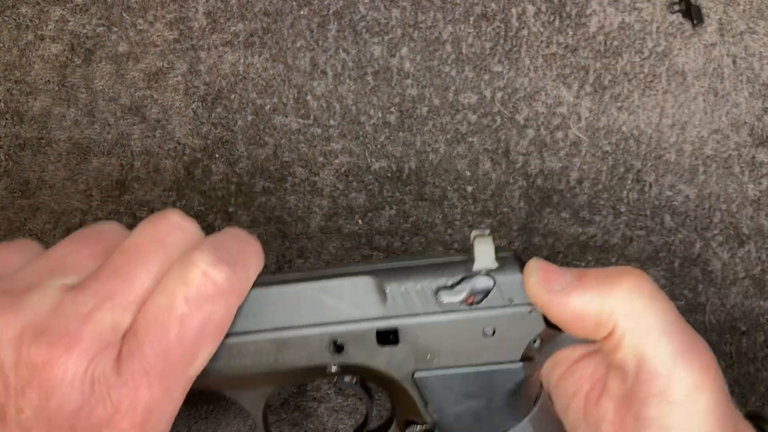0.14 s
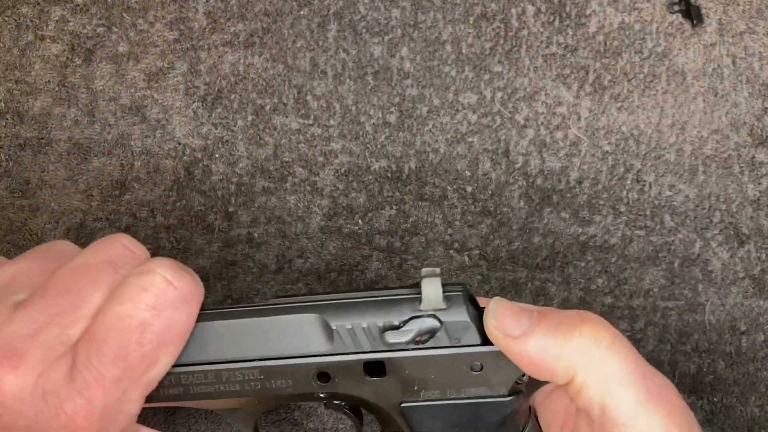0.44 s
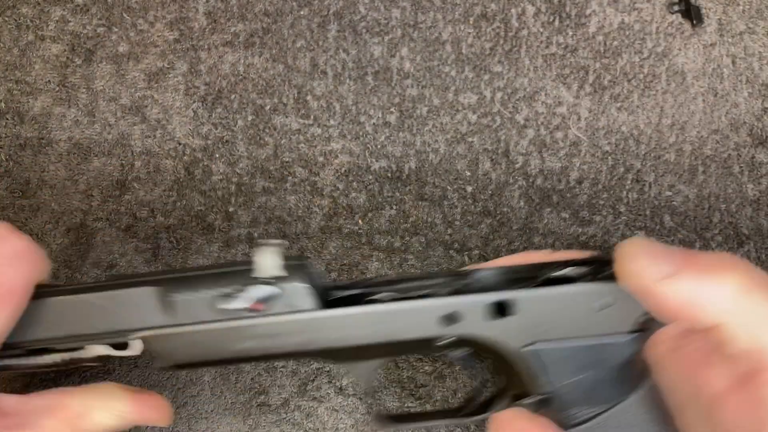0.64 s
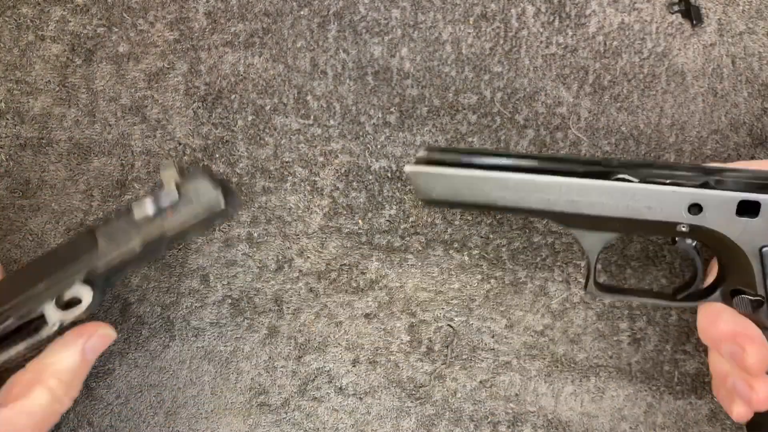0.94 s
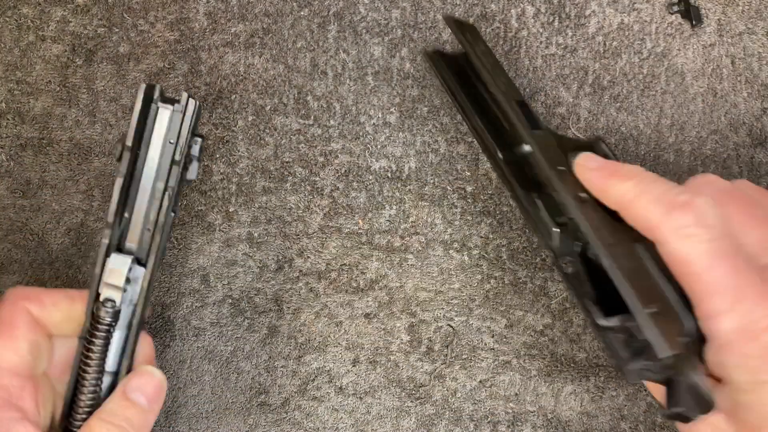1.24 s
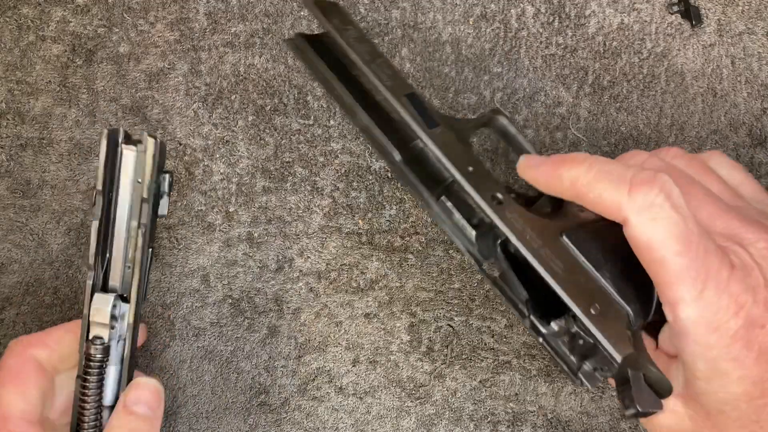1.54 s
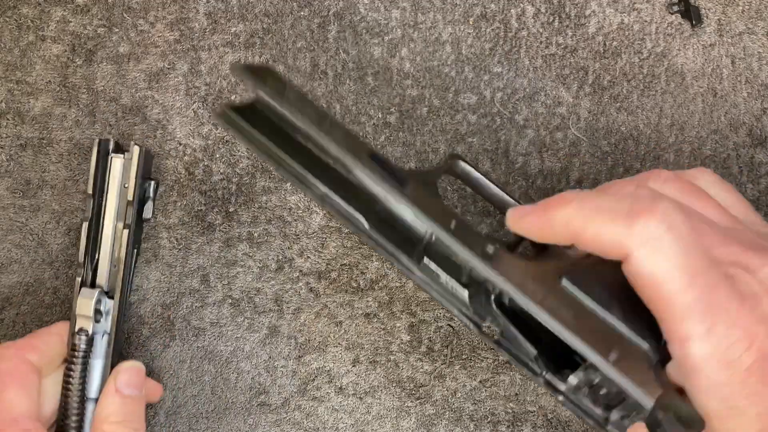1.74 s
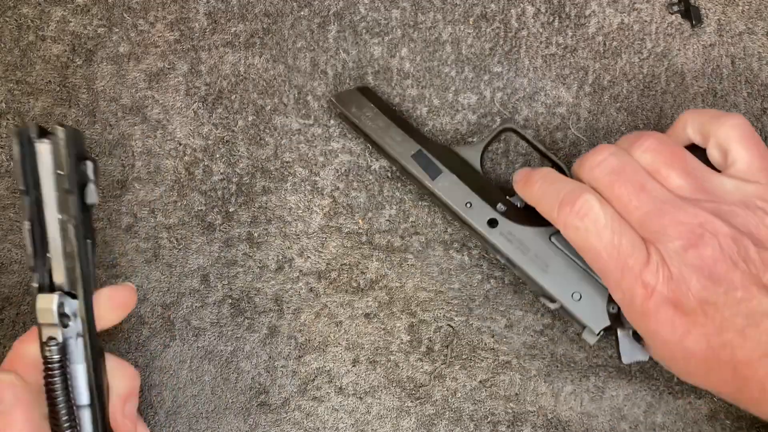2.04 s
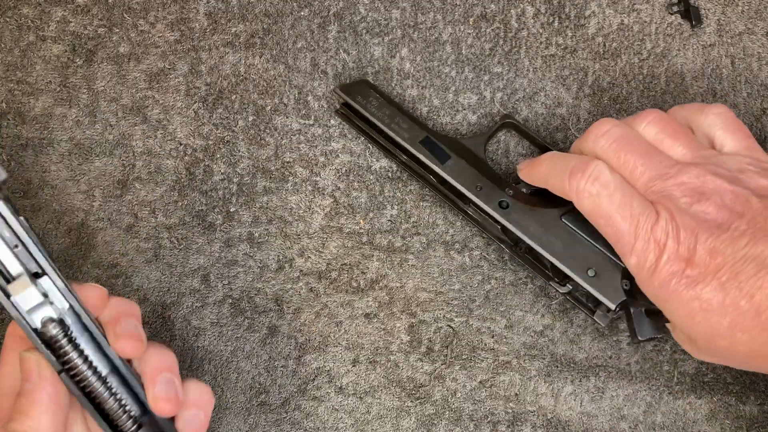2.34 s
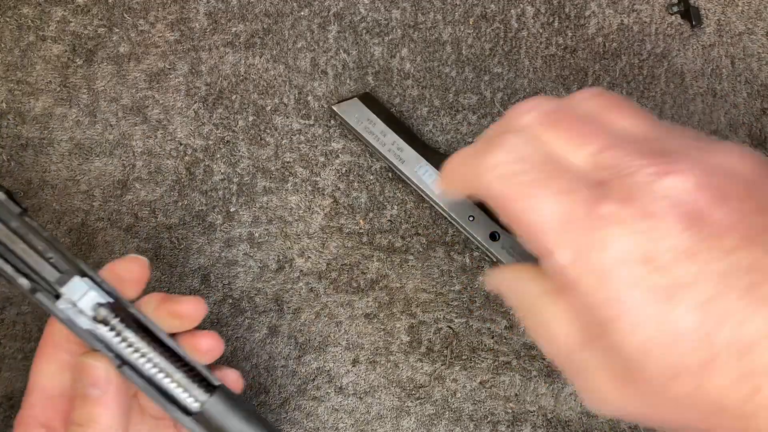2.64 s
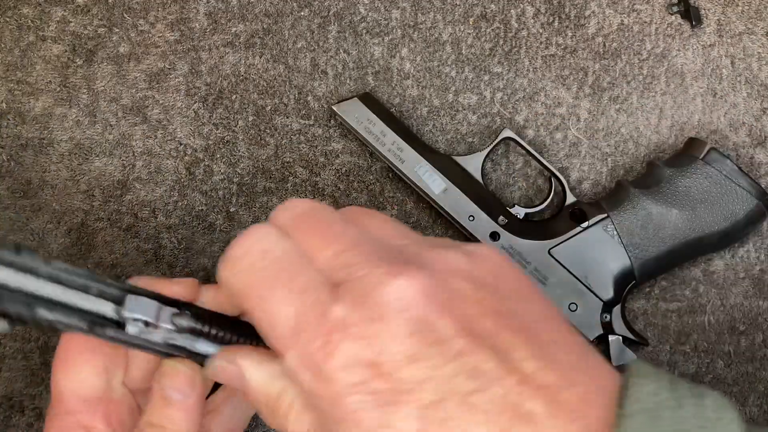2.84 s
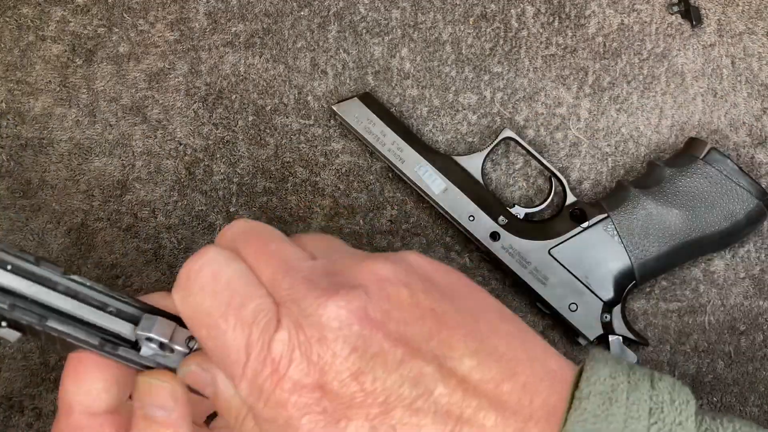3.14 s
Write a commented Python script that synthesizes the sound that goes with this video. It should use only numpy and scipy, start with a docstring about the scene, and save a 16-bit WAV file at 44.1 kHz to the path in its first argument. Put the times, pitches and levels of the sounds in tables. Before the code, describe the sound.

A pistol is taken apart close to the microphone in a small dry room. Small catches click at 0.1 and 0.26 s; from 0.5 to 0.75 s the steel slide scrapes along its rails, rising in pitch, with bright ringing clacks. Very faint handling ticks at 1.5, a soft bump at 2.04, a lever tick at 2.3, a loud deep carpeted thud at 2.44, a faint tick at 2.9. Low hum and hiss.

```python
"""Small catches click, then a steel slide scrapes forward along its rails and knocks free: a pistol is
taken apart close to the microphone in a small room. The frame touches the carpeted table, a loose lever
ticks, and the frame is set down with a dull thud. Faint handling ticks, mains hum, rumble and hiss lie
underneath. Metal sounds are short noise bursts or rubbing slips sent through ringing or coloured filters;
the thuds are soft pushes into the table's low modes, with a muffled rattle."""
import sys
import numpy as np
from scipy import signal
from scipy.fft import rfft, irfft, next_fast_len
from scipy.io import wavfile
from scipy.ndimage import uniform_filter1d, map_coordinates

SR = 44100
rng = np.random.default_rng(int(sys.argv[2]) if len(sys.argv) > 2 else 0)


def generate_wav(signal):
    """Clip the signal to [-1, 1] and save it as 16-bit WAV at the path in sys.argv[1]."""
    frames = np.transpose(np.atleast_2d(signal))
    scaled = np.clip(frames, -1, 1) * 32767
    pcm = np.round(scaled).astype(np.int16)
    wavfile.write(sys.argv[1], SR, pcm)


N = 145530
T = np.arange(N) / SR  # time of every sample, in seconds

# centres of the bass, middle and treble tone settings of each click: pitch_hz
TONE_CENTRES_HZ = [1260, 2500, 5100]


def amp(db):
    """Turn decibels into gain."""
    return 10 ** (np.asarray(db) / 20)


def unit(x):
    """Scale a sound to an rms of 1."""
    return x / np.sqrt(np.mean(x ** 2) + 1e-20)


def along(points, hz):
    """Read a curve of (Hz, value) points, with frequency on a log axis."""
    point_hz, value = np.transpose(points)
    return np.interp(np.log(hz + 1), np.log(point_hz + 1), value)


def coloured(x, points):
    """Filter x to a curve of (Hz, dB) points, with no sound ahead of its cause."""
    m = 2 * next_fast_len(len(x) // 2 + 4096)
    curve_db = along(points, np.fft.rfftfreq(m, 1 / SR))
    # folding the cepstrum (the spectrum of the log gain) forward in time makes the filter causal
    cepstrum = irfft(np.log(amp(curve_db)), m)
    cepstrum[1:m // 2] *= 2
    cepstrum[m // 2 + 1:] = 0
    response = np.exp(rfft(cepstrum))
    return irfft(rfft(x, m) * response, m)[:len(x)]


def above(x, hz):
    """Steep high-pass: keep what lies above hz."""
    return signal.sosfilt(signal.butter(8, hz, "high", fs=SR, output="sos"), x)


def add(track, start_s, x):
    """Mix x into the track at start_s."""
    i = round(start_s * SR)
    track[i:i + len(x)] += x[:N - i]


def ring(modes, t):
    """Add up dying sines, one for each (Hz, dB, t60) mode; t60 is the time to fall by 60 dB."""
    return sum(amp(db) * 1e-3 ** (t / t60) * np.sin(2 * np.pi * hz * t) for hz, db, t60 in modes)


def burst(length_s):
    """A short rough contact: noise that dies away, with the energy of rms 1 held for length_s."""
    t = T[:SR // 4]
    x = rng.standard_normal(len(t)) * np.exp(-(t / length_s) ** 2)
    return x / np.linalg.norm(x) * np.sqrt(length_s * SR)


def steel(force, ring_db):
    """Contact force on slide and frame, heard directly and through the ringing steel."""
    # slide and frame ring together: pitch_hz, level_db, t60_s
    steel_modes = [(950, -18.5, .03), (1170, -8.5, .05), (1264, -7.5, .05), (1610, -13.5, .035),
                   (2220, -3, .035), (2420, -6, .03), (2790, -9.5, .03), (3188, 0, .05), (3336, -1.5, .05),
                   (3760, -8.5, .02), (4210, -10, .025), (4970, -1, .02), (5850, 0.5, .02),
                   (6380, -2, .025)]
    # tone of the direct contact sound: pitch_hz, level_db
    crack_tone = [(450, -76.5), (700, -34.5), (900, -10), (1200, 9.5), (1450, -2), (1900, -8), (2350, 6),
                  (2800, -6), (3250, 4), (4450, -1.5), (6200, 0), (7200, -9)]
    direct = coloured(force, crack_tone)
    rung = signal.fftconvolve(force, ring(steel_modes, T[:SR // 4]))[:len(force)]
    both = unit(direct) + amp(ring_db) * unit(rung)
    return np.std(force) * above(both, 960)  # little is radiated below 960 Hz


def scrape():
    """Dense uneven slips on the rails ring the steel; the balance shifts as the slide runs forward."""
    # steel rubbing on the rails, a small nudge and then the full pull:
    # time_s, bass_level_db, middle_level_db, treble_level_db
    nudge = [(.238, -101.5, -90.5, -99), (0.253, -71, -60.5, -50), (0.27, -74, -59, -51.5),
             (0.288, -74.5, -70, -71.5), (0.309, -89.5, -104.5, -92)]
    pull = [(0.467, -94.5, -98, -92.5), (0.48, -84, -81.5, -68.5), (0.497, -75.5, -73.5, -60.5),
            (0.511, -66, -62, -50.5), (0.52, -48, -45.5, -43.5), (.543, -52.5, -51.5, -56),
            (0.569, -50.5, -47, -43.5), (0.589, -60, -52.5, -50), (.604, -55.5, -46.5, -45),
            (0.614, -61.5, -53, -52), (.622, -60, -49, -43.5), (.633, -58, -56.5, -52.5),
            (0.644, -60, -50, -50), (.658, -58, -37.5, -45), (.677, -57, -36, -39.5),
            (.698, -53, -44, -42.5), (.724, -53, -45.5, -42), (0.737, -63, -60.5, -65),
            (.75, -83.5, -94.5, -95)]
    slips_per_s, slip_spread_db = 5000, 3.5
    chatter_db, chatter_points_per_s = 2.5, 257.1  # wandering loudness of the slips

    happens = rng.random(N) < slips_per_s / SR
    direction = rng.choice([-1, 1], N)
    slips = happens * direction * amp(slip_spread_db * rng.standard_normal(N))
    chatter = map_coordinates(rng.standard_normal(N // 10), [T * chatter_points_per_s])
    rubbing = steel(slips * amp(chatter_db * chatter), -3.5)

    spectrum = rfft(rubbing)
    hz = np.fft.rfftfreq(N, 1 / SR)
    below_middle, below_treble = [1 / (1 + (hz / edge) ** 16) for edge in (1850, 3600)]
    bands = [below_middle, below_treble - below_middle, 1 - below_treble]
    time_s, *levels = np.transpose(nudge + pull)
    out = np.zeros(N)
    for band, level_db in zip(bands, levels):
        out += unit(irfft(spectrum * band, N)) * amp(np.interp(T, time_s, level_db))
    return out * (T > time_s[0]) * (T < time_s[-1])


def rasp():
    """Friction on the rails feeds one narrow band that climbs in pitch as the slide runs out."""
    # path of the rasp: time_s, pitch_hz, level_db
    rasp_path = [(0.427, 928.3, -100), (.439, 953, -77), (0.468, 948.8, -81.5), (0.507, 1013, -67),
                 (0.521, 1138, -47), (.545, 1158, -51), (0.567, 1159, -47), (.585, 1450, -54),
                 (0.603, 1580, -51), (.635, 1709, -71)]
    points_per_s = 190  # faster wandering makes the band wider
    time_s, pitch_hz, level_db = np.transpose(rasp_path)
    knots = rng.standard_normal((2, N // 10))
    a, b = (map_coordinates(k, [T * points_per_s]) for k in knots)
    phase = 2 * np.pi * np.cumsum(np.interp(T, time_s, pitch_hz)) / SR
    band = unit(a * np.cos(phase) + b * np.sin(phase))
    return band * amp(np.interp(T, time_s, level_db, left=-np.inf, right=-np.inf))


def clicks():
    """The slide's lugs strike the frame and ring the steel; each contact has its own tone."""
    # strikes, levels before the tone: start_s, level_db, contact_s, bass_db, middle_db, treble_db
    strikes = [(0.516, -38, 0.0018, -1, -7, 8), (0.5188, -30, .004, -1.5, -1.5, -0.5),
               (.5302, -36.5, 0.0018, 1, 2.5, 1.5), (.533, -37, .004, 5, 1, 0),
               (.5645, -41, .008, 4, -5, 2.5), (.6475, -37, 0.0045, -14, 0.5, 1),
               (0.679, -35.5, 0.0015, -12, 2, -1), (.689, -32.5, .002, -6.5, 0.5, 2.5),
               (.6915, -30, 0.0016, -6, 1, 0), (0.7291, -31.5, 0.0036, 0, 9.5, 1),
               (.732, -25, .002, -3, 2, -3)]
    out = np.zeros(N)
    for start_s, level_db, contact_s, *tone_db in strikes:
        tone = list(zip(TONE_CENTRES_HZ, tone_db))
        add(out, start_s, amp(level_db) * coloured(steel(burst(contact_s), -5.5), tone))
    return out


def snap(contact_s, modes, t60_s, low_hz):
    """A rough contact into the heavily damped modes of a small part, with its diffuse echo."""
    spill_db, spill_t60_s = -15, 0.2  # the room's smooth answer, its level before the low cut
    force = burst(contact_s)
    t = T[:len(force)]
    body = ring([(hz, db, t60_s) for hz, db in modes], t)
    # small parts radiate little below low_hz
    direct = np.std(force) * unit(above(signal.fftconvolve(force, body)[:len(t)], low_hz))
    spill = above(rng.standard_normal(len(t)), low_hz) * amp(spill_db - 60 * t / spill_t60_s)
    return direct + spill


def catches():
    """Small catches inside the action click with hardly any ring of their own."""
    # clicks, levels before the tone: start_s, level_db, contact_s, bass_db, middle_db, treble_db
    catch_clicks = [(0.114, -53, 0.003, -3, -4, 7.5), (0.1159, -42, 0.0019, -1.5, 5, -3.5),
                    (.254, -55, 0.0017, -19.5, -19.5, 6.5), (0.2567, -54.5, 0.0037, -3, -5, 9),
                    (0.267, -48, 0.0018, -10, -1.5, 1.5)]
    # modes of the catches: pitch_hz, level_db
    catch_modes = [(950, -9), (1200, -17), (2320, 10), (3300, -4), (3950, 2), (5000, 8.5), (5600, -5),
                   (6150, 0)]
    out = np.zeros(N)
    for start_s, level_db, contact_s, *tone_db in catch_clicks:
        click = snap(contact_s, catch_modes, t60_s=.009, low_hz=950)
        add(out, start_s, amp(level_db) * coloured(click, list(zip(TONE_CENTRES_HZ, tone_db))))
    return out


def lever():
    """A loose lever in the frame snaps over: one contact into its heavily damped modes."""
    # the single snap: start_s, level_db, contact_s
    lever_snap = (2.3128, -40, 0.001)
    # modes of the lever: pitch_hz, level_db
    lever_modes = [(2800, -18), (3200, -3), (3550, 2.5), (3900, -1.5), (4900, -2.5), (6200, 1), (6750, -1)]
    out = np.zeros(N)
    start_s, level_db, contact_s = lever_snap
    add(out, start_s, amp(level_db) * snap(contact_s, lever_modes, t60_s=.008, low_hz=2850))
    return out


def thuds():
    """Carpet spreads each blow into a soft push: only low table modes and a muffled rattle sound."""
    # the frame meets the carpet: start_s, level_db, push_s (half the time to the peak),
    # rattle_db (relative to the thud's level)
    blows = [(2.034, -50, .0008, -22), (2.0445, -37, .0012, -30), (2.444, -6.5, .0004, -23)]
    # table modes: pitch_hz, level_db, t60_s
    table_modes = [(62, -14, .11), (84, 0, .095), (126, -15, .15), (220, -19, .13), (285, -9, .08),
                   (350, -11, .05), (415, -14, .045)]
    # tone of the muffled rattle: pitch_hz, level_db
    rattle_tone = [(25, -21), (70, -11), (150, -3.5), (330, 7.5), (480, -11.5), (700, -24.5), (1050, -30),
                   (1300, -54.5), (2200, -62), (2900, -51), (5000, -52), (7000, -56.5)]
    swell_s = .004  # the table takes up the weight
    rattle_t60_s, rattle_rise_s = .2, .005

    out, t = np.zeros(N), T[:SR // 2]
    for start_s, level_db, push_s, rattle_db in blows:
        push = (t / push_s) ** 4 * np.exp(-2 * t / push_s)
        table = ring(table_modes, t) * (1 - np.exp(-t / swell_s))
        boom = signal.fftconvolve(push / push.sum(), table)[:len(t)]
        rattle = unit(coloured(rng.standard_normal(len(t)), rattle_tone))
        rattle *= amp(rattle_db - 60 * t / rattle_t60_s)
        rattle *= 1 - np.exp(-(t / rattle_rise_s) ** 2)
        add(out, start_s, amp(level_db) * (rattle - boom))
    return out


def ticks():
    """Loose parts shift in the hand, damped by the fingers: noise bursts kept near one pitch."""
    # faint ticks: start_s, level_db, length_s, pitch_hz
    hand_ticks = [(1.512, -80, 0.016, 1300), (1.534, -69.5, .012, 1536), (1.547, -74.5, .012, 1536),
                  (1.554, -71.5, 0.02, 1504), (1.583, -74.5, 0.0089, 1450), (2.886, -57, .003, 1639),
                  (2.898, -75, 0.017, 1630), (2.94, -74, .007, 1750), (2.964, -83.5, .02, 2050)]
    # tone around that pitch: multiple of the pitch, level_db
    tone_shape = [(.55, -55), (.76, -18.5), (.87, 4), (1, 2.5), (1.15, 1.5), (1.3, -29), (1.55, -56)]
    out = np.zeros(N)
    for start_s, level_db, length_s, pitch_hz in hand_ticks:
        force = burst(length_s)
        tone = [(pitch_hz * multiple, db) for multiple, db in tone_shape]
        add(out, start_s, amp(level_db) * np.std(force) * unit(coloured(force, tone)))
    return out


def room(x):
    """Short diffuse answer of the small room: noise whose bands die at their own speeds."""
    # how long the room sounds: pitch_hz, t60_s
    room_decay = [(100, 0.43), (1000, 0.07), (3000, 0.13), (7000, 0.06)]
    delay_s = .004
    hz, t, z = signal.stft(rng.standard_normal(SR // 2), SR, nperseg=256)
    fade = amp(-60 * t / along(room_decay, hz)[:, None])
    tail = signal.istft(z * fade, SR, nperseg=256)[1]
    tail = np.pad(tail / np.linalg.norm(tail), (round(delay_s * SR), 0))
    return signal.fftconvolve(x, tail)[:N]


def suppress(x):
    """A noise suppressor turns each band down as it falls below the threshold."""
    threshold_db, from_hz = -99, 450  # nothing is turned down at or below from_hz
    hz, _, z = signal.stft(x, SR, nperseg=512)
    # power averaged over three neighbouring bands; abs guards against rounding below zero
    power = np.abs(uniform_filter1d(np.abs(z) ** 2, size=3, axis=1))
    threshold = amp(threshold_db) ** 2 * (hz[:, None] > from_hz)
    gain = (power + 1e-20) / (power + threshold + 1e-20)
    return signal.istft(z * gain, SR, nperseg=512)[1][:, :N]


def background():
    """The microphone's own floor: odd mains harmonics over a faint rumble and hiss."""
    # mains hum: pitch_hz, level_db (rms)
    hum_lines = [(60, -63.5), (180, -75.5), (300, -86)]
    # tone of the rumble and hiss: pitch_hz, level_db
    floor_tone = [(20, -2.5), (60, 4), (110, -2), (250, -7.5), (400, -20), (600, -31.5), (2000, -32.5),
                  (6500, -36.5), (8000, -37), (20000, -40.5)]
    floor_db = -79.5
    hum = np.zeros(N)
    for hz, level_db in hum_lines:
        hum += np.sqrt(2) * amp(level_db) * np.sin(2 * np.pi * (hz * T + rng.random()))
    return hum + amp(floor_db) * unit(coloured(rng.standard_normal(N), floor_tone))


def scene():
    """Metal and thuds in the room; the deepest bass of the thuds is thinned."""
    metal = scrape() + rasp() + clicks() + ticks()
    low = signal.sosfilt(signal.butter(1, 47, "high", fs=SR, output="sos"), thuds())
    echo = room(amp(-9.5) * metal + amp(-24) * low)
    # catches and lever carry their own diffuse echo
    return (catches() + lever() + metal + low + echo)[None]


def record(dry):
    """Noise suppression, then the hum and hiss of the electronics, and a steep band limit."""
    top_hz = 7030
    m = next_fast_len(N + SR // 2)
    keep = 1 / np.sqrt(1 + (np.fft.rfftfreq(m, 1 / SR) / top_hz) ** 110)
    return irfft(rfft(suppress(dry) + background(), m) * keep, m)[..., :N]


dry = scene()
out = record(dry)
generate_wav(out)
```